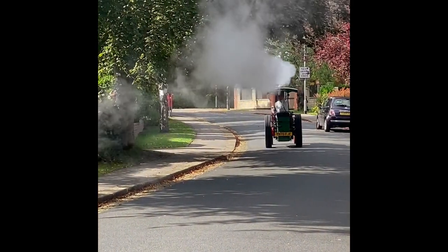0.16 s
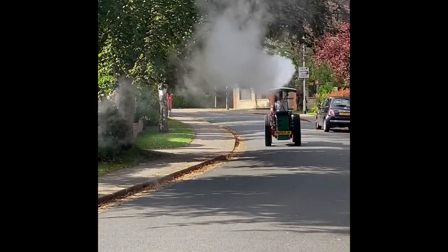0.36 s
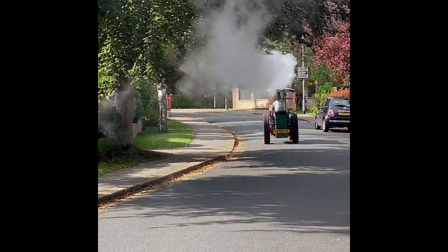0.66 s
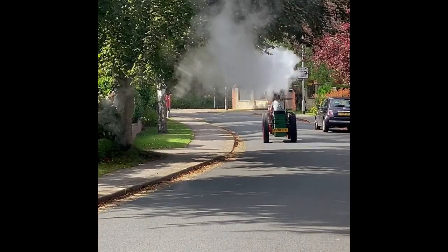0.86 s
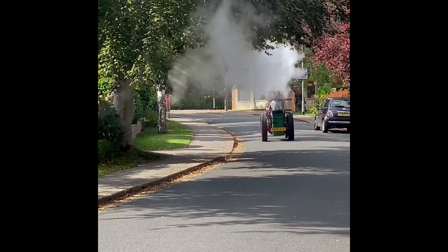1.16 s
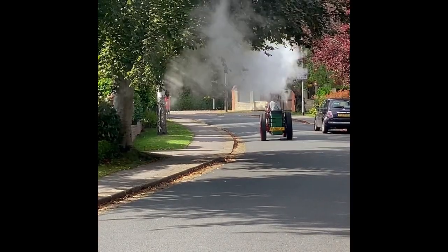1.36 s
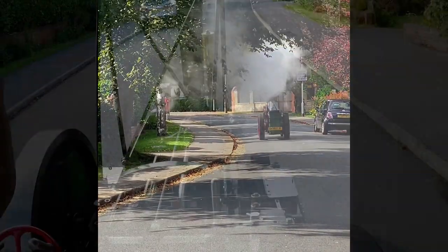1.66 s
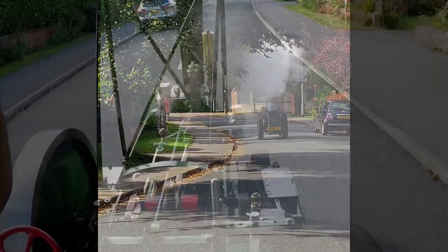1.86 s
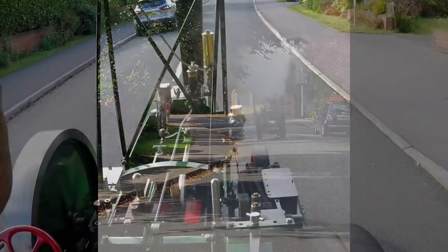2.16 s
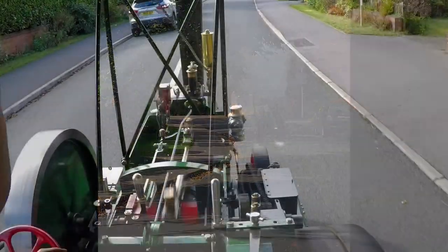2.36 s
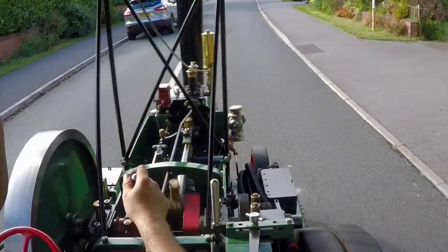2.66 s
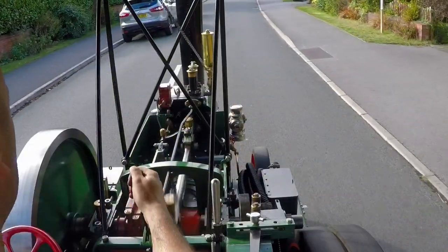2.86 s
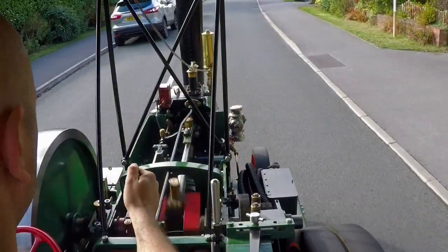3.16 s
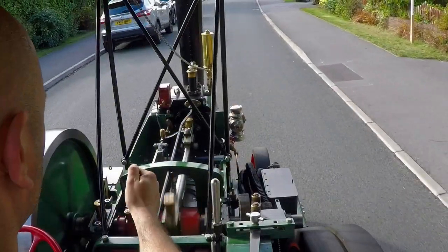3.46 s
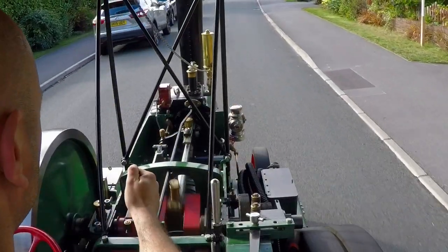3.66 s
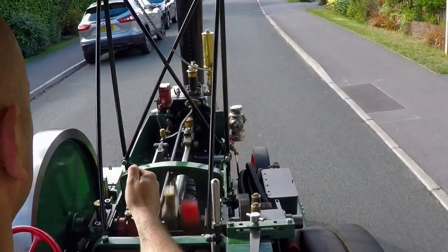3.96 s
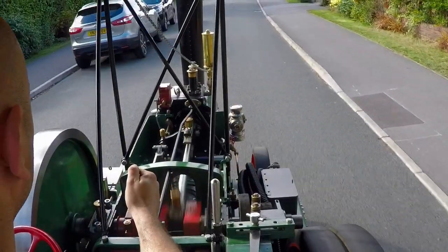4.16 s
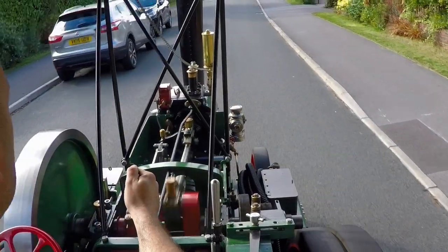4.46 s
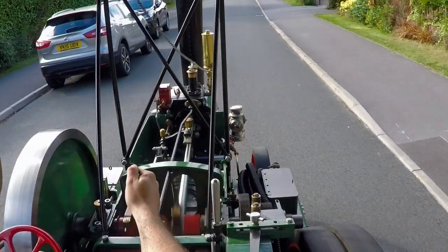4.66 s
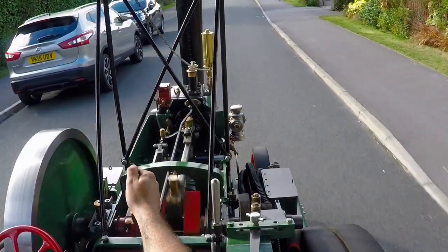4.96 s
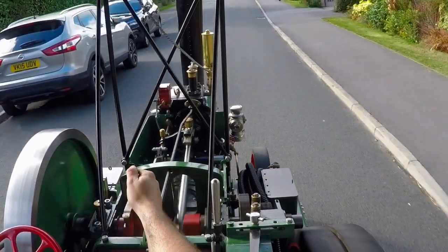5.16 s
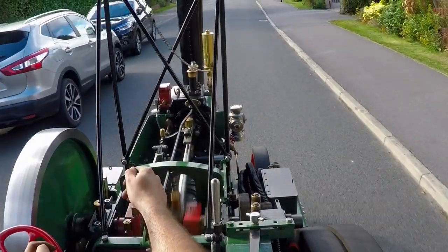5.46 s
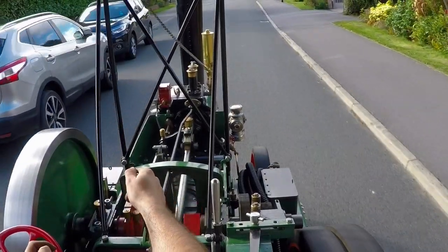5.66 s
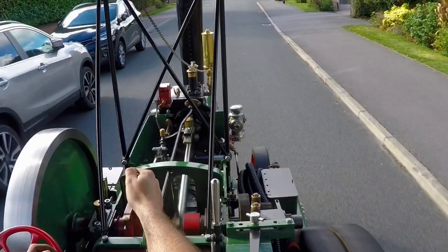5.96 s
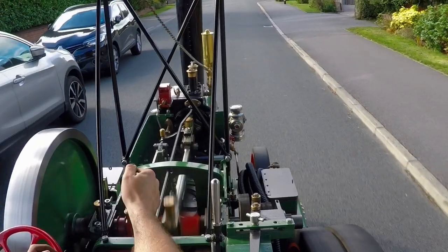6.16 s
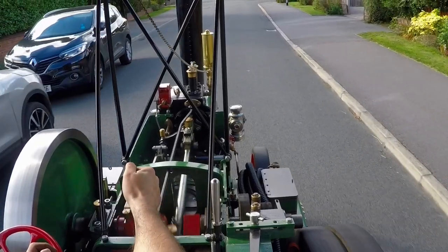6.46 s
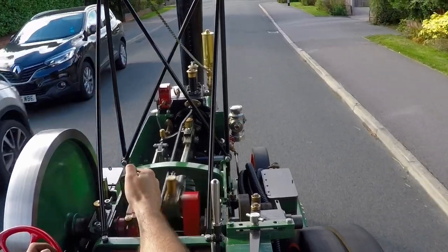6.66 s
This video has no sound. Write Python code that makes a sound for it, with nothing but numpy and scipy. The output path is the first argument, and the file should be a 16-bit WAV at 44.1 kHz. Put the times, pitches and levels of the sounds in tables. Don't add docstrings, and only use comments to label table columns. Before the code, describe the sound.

From 0 to 1.5 s, a small steam tractor moves away along a quiet road, heard from a stereo kerbside microphone. Soft, low chimney pulses come about ten a second, each with a bright burst of steam hiss and a reedy rasp that strengthens around 1 s and then drops. Gentle road noise spreads beneath, easing slightly. Between about 1.5 and 2.4 s this crossfades to the driving seat, far louder, closer and centred. Here heavy low thumps repeat just over eight times a second, shaking the frame over a constant deep rumble of gears and wheels. Rods and castings clank mid-pitched and unevenly, with sharper knocks near 2.7, 2.9 and 3.3 s, while loose parts tick and rattle drily. Faint puffs of valve steam sit on top. The beat stays steady but varied in force, with a particularly hard thump near 6.8 s, continuing to the end at about 7 s.

```python
import sys
import numpy as np
from scipy import signal
from scipy.fft import rfft, irfft, next_fast_len
from scipy.io import wavfile
from scipy.ndimage import uniform_filter1d, map_coordinates

SR = 44100
rng = np.random.default_rng(int(sys.argv[2]) if len(sys.argv) > 2 else 0)


def decibels_to_gain(level_db):
    exponent = np.asarray(level_db, float) / 20
    return 10 ** exponent


def to_wav(s):
    ch = np.atleast_2d(s).T
    pcm = np.round(np.clip(ch, -1, 1) * 32767)
    wavfile.write(sys.argv[1], SR, pcm.astype(np.int16))


N = 300762
T = np.arange(N) / SR


def unit(x):
    return x / np.sqrt(np.mean(x ** 2) + 1e-20)


def along(points, hz):
    f, v = np.transpose(points)
    return np.interp(np.log(hz + 1), np.log(f + 1), v)


def curve(points, t):
    return np.interp(t, *np.transpose(points))


def filtered(x, response):
    m = next_fast_len(N + SR // 2)
    return irfft(rfft(x, m) * response(np.fft.rfftfreq(m, 1 / SR)), m)[..., :N]


def resonances(modes):
    def response(f):
        total = 0
        for k, (hz, width_hz, db) in enumerate(modes):
            damping = 1j * f * width_hz
            total = total + (-1) ** k * decibels_to_gain(db) * damping / (hz * hz - f * f + damping)
        return total
    return response


def sharp_resonance(hz, width_hz):
    return lambda f: resonances([(hz, width_hz, 0)])(f) ** 2


def colour(spectrum):
    return lambda f: decibels_to_gain(along(spectrum, f))


def wobble(rate_hz):
    return map_coordinates(rng.standard_normal(int(N * rate_hz / SR) + 4), [T * rate_hz])


def noise(gain, response):
    passed = np.mean(np.abs(response(np.fft.rfftfreq(2 ** 15, 1 / SR))) ** 2)
    return filtered(gain * rng.standard_normal(N), response) / np.sqrt(passed)


def pulses(times_s, sizes):
    at = np.clip(np.round(np.ravel(times_s) * SR).astype(int), 0, N - 1)
    return np.bincount(at, np.ravel(sizes), N)


def ring_down(blows, t60_s, samples):
    return signal.fftconvolve(blows, decibels_to_gain(-60 * T[:samples] / t60_s))[:N]


def per_beat(times_s, db, shape, rest_db):
    beat = np.clip(np.searchsorted(times_s, T) - 1, 0, None)
    stroke = decibels_to_gain(db[beat] + curve(shape, T - times_s[beat]))
    return uniform_filter1d(np.hypot(stroke, decibels_to_gain(rest_db)), size=90)


def patchy(x, depth_db):
    z = signal.stft(x, nperseg=1024)[2]
    field = uniform_filter1d(rng.standard_normal(z.shape[-2:]), size=3, axis=0)
    field = uniform_filter1d(field, size=3, axis=1)
    gain = decibels_to_gain(depth_db * unit(field) - depth_db ** 2 / 9.7)
    return signal.istft(z * gain, nperseg=1024)[1][..., :N]


# pitch_hz, density_db
ROAD_SPECTRUM = [(40, -51), (60, -23), (130, -4.5), (280, -15), (410, -6.5), (560, -23.5), (970, -12.5),
                 (1490, -20.5), (1820, -15.5), (2500, -20), (3200, -25), (4000, -25), (4700, -26),
                 (6500, -60.5)]
# pitch_hz, correlation
ROAD_LIKENESS = [(60, 1), (300, 0.64), (650, -0.2), (1300, 0.63), (3100, -0.74), (4500, 0.059)]
# time_s, level_db
ROAD_SWELL = [(0, 3), (.4, 0.5), (.8, -1), (1.2, -1), (1.6, -1.5)]


def street():
    def shares(f):
        angle = np.arccos(np.clip(along(ROAD_LIKENESS, f), -1, 1)) / 2
        return decibels_to_gain(along(ROAD_SPECTRUM, f)) * [np.cos(angle), np.sin(angle)]

    gain = decibels_to_gain(0.39 * wobble(13.23) + curve(ROAD_SWELL, T))
    mid, side = filtered(rng.standard_normal((2, N)) * gain, shares)
    return decibels_to_gain(-38) * unit(np.array([mid + side, mid - side]))


FAR_BEATS = 25
# time_s, smokebox_db, chimney_db
CHUFF_LEVELS = [(0.0, -39, -40), (0.106, -40, -42), (0.414, -39, -36.5), (0.474, -40, -39.5),
                (0.668, -40.5, -36.5), (0.85, -44.5, -37), (1.096, -44.5, -38), (1.55, -44.5, -37.5)]
# pitch_hz, width_hz, level_db
SMOKEBOX = [(62, 24, 0), (81, 24, -3), (135, 50, -12)]
# pitch_hz, width_hz, level_db
CHIMNEY = [(172, 40, -11), (209, 29, 0), (402, 36, -9)]


def far_chuff(turns):
    beat = np.arange(-1, FAR_BEATS)[:, None] + [.26, .26 + 11 / 21]
    times = np.interp(beat, turns, T)
    time_s, box_db, pipe_db = np.transpose(CHUFF_LEVELS)
    scatter_db = rng.normal(0, 1.0, times.shape)

    def ring(modes, weak_db):
        sizes = decibels_to_gain(scatter_db + [0, weak_db]) * (beat > -.5)
        return unit(filtered(pulses(times, sizes), lambda f: resonances(modes)(f) ** 2))

    box = decibels_to_gain(np.interp(T, time_s, box_db)) * ring(SMOKEBOX, weak_db=-1.5)
    pipe = decibels_to_gain(np.interp(T, time_s, pipe_db)) * ring(CHIMNEY, weak_db=-1.0)
    return box + pipe


# time_s, level_db
DRAUGHT = [(0, 1.5), (.7, 1), (.82, 3), (1.2, 5), (1.3, -9.5), (1.5, -3.5), (1.8, -4), (2.2, -8.5),
           (2.5, -12)]
# pitch_hz, density_db
STEAM_SPECTRUM = [(3500, -14), (4700, -8.5), (5200, 3.5), (6200, -9), (6900, -3.5), (7500, -7),
                  (8400, -2.5), (9900, -1.5), (11000, -11), (13000, -16.5), (15500, -24)]
# pitch_hz, right_lead_rad
PORT_LEAD = [(3000, 5.5), (4800, 3.2), (5600, 2.7), (8650, 0), (11700, -3.14), (14300, -6.28)]
# pitch_hz, width_hz, level_db
BARK_MODES = [(1880, 160, -2), (1965, 60, -3), (2450, 80, -2), (2840, 80, 0), (2975, 50, -2),
              (3300, 300, -8)]


def far_steam(turns):
    vent_s = np.interp(np.arange(FAR_BEATS) - .15, turns, T, left=-.02)
    draught_db = curve(DRAUGHT, vent_s)
    hiss_db = -35.5 + .35 * draught_db + rng.normal(0, 1, FAR_BEATS)
    bark_db = -36 + draught_db
    plume = [(0, -7), (.01, -2.5), (.035, 0), (.05, -2), (.064, -9), (.085, -6), (.1, -8)]
    level_db = np.interp(T, vent_s, hiss_db)

    hiss_gain = per_beat(vent_s, hiss_db + 2.5, plume, level_db - 6.5) * decibels_to_gain(2.1 * wobble(59.35))
    steam = noise(hiss_gain, colour(STEAM_SPECTRUM))
    ports = lambda f: np.exp(.5j * curve(PORT_LEAD, f) * np.array([[-1], [1]]))
    scattered = decibels_to_gain(level_db - 16) * np.array([noise(1, colour(STEAM_SPECTRUM)) for _ in "LR"])
    bark_gain = per_beat(vent_s, bark_db - 3.5, plume, -51)
    bark = np.array([noise(bark_gain, resonances(BARK_MODES)) for _ in "LR"])
    return patchy(filtered(steam, ports) + scattered + bark, depth_db=2.5)


# time_s, beats_per_s
EXHAUST_RATE = [(0, 10.1), (.7, 9.97), (1.4, 9.87), (2.6, 9.87)]


def far_tractor():
    turns = np.cumsum(curve(EXHAUST_RATE, T)) / SR
    return far_chuff(turns) * decibels_to_gain([[.7], [-.7]]) + far_steam(turns)


def drop_faint(x, floor_db):
    hz, _, z = signal.stft(x, SR, nperseg=1024, scaling="psd")
    power = (np.abs(z[:512]) ** 2).reshape(128, 4, -1).mean(axis=1)
    band_floor_db = 2 * floor_db - 7 * (hz[:512:4, None] > 7000)
    loud = uniform_filter1d(power, 3, axis=1) > decibels_to_gain(band_floor_db)
    z[:512] *= np.repeat(loud, 4, axis=0) | (hz[:512, None] < 3000)
    return signal.istft(z, SR, nperseg=1024, scaling="psd")[1][:N]


def kerb_stereo(x):
    outside = lambda f, low_hz, high_hz: (f < low_hz) | (f > high_hz)
    mid = filtered(x[0] + x[1], lambda f: outside(f, 11150, 12300)) / 2
    side = filtered(x[0] - x[1], lambda f: outside(f, 8350, 9000) & outside(f, 13900, 20000)) / 2
    mid = drop_faint(mid, floor_db=-92.5)
    return np.array([mid + side, mid - side])


# time_s, effort_db, valve_leak_db; the low early rows make the seat view swell in steeply
ENGINE_LOAD = [(1.5, -8.5, -6), (1.8, -4, -4), (2.1, -3, 1), (2.5, -0.5, -3.5), (3.1, 1.5, -3),
               (3.9, 1.5, 1.5), (5.1, .5, 1), (5.4, 2, -0.5), (6.2, 0.5, -1), (6.8, 2.5, 1.5)]
# time_s, thump_db, clank_db
UNEVEN_BEATS = [(2.658, 2.5, 2), (2.782, 3, 0), (3.034, 0, -3), (3.286, 2.5, -1), (3.409, -2.5, 0),
                (3.535, 1.5, 2), (3.658, -1, -3), (3.904, -3, -0.5), (4.027, 2, 0.5), (4.395, 0.5, 0),
                (4.517, -0.5, 2.5), (4.883, 0, 2.5), (5.003, 0.5, 1.5), (5.124, 2.5, 2.5), (5.243, -2, 0),
                (5.485, -4, -1.5), (5.606, 0, -3), (5.725, -0.5, 0.5), (5.846, 0, -0.5), (6.085, 0.5, 0.5),
                (6.326, 0, -2), (6.444, -1, 1), (6.562, 0, 0), (6.802, 5, 4)]


def beats():
    count = 44
    k = np.arange(count)
    beat_s = 1.497 + .1185 * k + .228 * (1 - np.exp(-k / 16.5))
    load_s, effort_db, leak_db = np.transpose(ENGINE_LOAD)
    effort_db = np.interp(beat_s, load_s, effort_db)
    leak_db = np.interp(beat_s, load_s, leak_db)

    odd_s, *odd_db = np.transpose(UNEVEN_BEATS)
    nearest = np.abs(odd_s[:, None] - beat_s).argmin(axis=1)
    thump, clank = (np.bincount(nearest, db, count) for db in odd_db)
    thump_db = -12 + 0.43 * effort_db + thump
    clank_db = -21.5 + effort_db + clank
    rattle_db = -48 + .1 * effort_db + clank
    puff_db = -58 + leak_db + .4 * clank
    return beat_s, thump_db, clank_db, rattle_db, puff_db


def hail():
    knocks = rng.random((700, 2))
    blows = pulses(knocks[:, 0] * N / SR, decibels_to_gain(14 * knocks[:, 1]))
    jolts = np.abs(ring_down(blows, t60_s=0.035, samples=900))
    return np.sqrt(0.82 + 0.15 * unit(jolts) ** 2)


# pitch_hz, density_db
VALVE_SPECTRUM = [(6500, -30), (8500, -9), (9300, -1), (10200, 0), (11000, -15), (13000, -22), (15500, -30)]


def valves():
    beat_s, *_, puff_db = beats()
    puff = [(0, -10), (.004, 0), (.022, -2), (.04, 1.5), (.053, 0), (.063, -12), (.13, -15)]
    gain = per_beat(beat_s, puff_db - 2.5, puff, -76) * decibels_to_gain(1.5 * wobble(70))
    return noise(gain, colour(VALVE_SPECTRUM))


# pitch_hz, density_db
RATTLE_SPECTRUM = [(2000, -30), (2800, 0), (3500, -3), (5000, -9), (6200, -14), (8000, -23), (10000, -33),
                   (15000, -44)]
# pitch_hz, width_hz, level_db
PIN_MODES = [(4850, 350, -2), (5950, 350, 0), (7650, 250, -3)]
# start_s, peak_db
LOOSE_TICKS = [(2.453, -28.5), (2.6638, -35), (2.686, -19.5), (2.7516, -27), (2.8795, -25.5),
               (3.1955, -34.5), (3.246, -24.5), (3.334, -34), (3.355, -24), (3.7882, -36), (3.8582, -25),
               (3.9482, -26.5), (4.082, -24), (4.2815, -26), (3.928, -31), (4.313, -31), (4.632, -25),
               (4.808, -30), (4.902, -20), (5.1556, -22.5), (5.4777, -22), (5.7388, -25), (6.24, -23),
               (6.2726, -27), (6.3664, -28)]


def small_parts(grain):
    beat_s, *_, rattle_db, _ = beats()
    loose = [(0, -1.5), (.014, 0.5), (.05, -1.5), (.06, -7), (.13, -4.5)]
    knock_ticks = [(at_s, -26 + 0.41 * db) for at_s, db in ROD_KNOCKS]
    tick_s, tick_db = np.transpose(list(LOOSE_TICKS) + knock_ticks)
    tick = ring_down(pulses(tick_s, decibels_to_gain(tick_db - 11)), t60_s=.018, samples=1800)

    chance = rng.random((220, 3))
    chatter_s = beat_s[(chance[:, 0] * len(beat_s)).astype(int)] + .11 * chance[:, 2] ** 2
    chatter = ring_down(pulses(chatter_s, decibels_to_gain(-51.5 + 9.2 * chance[:, 1])), t60_s=.018, samples=900)
    tick = np.hypot(tick, chatter)

    rattle = per_beat(beat_s, rattle_db, loose, -59.5) * grain
    out = noise(np.hypot(rattle, tick), colour(RATTLE_SPECTRUM))
    for hz, width_hz, db in PIN_MODES:
        out = out + decibels_to_gain(db) * noise(decibels_to_gain(-69 + 2.6 * wobble(40)), sharp_resonance(hz, width_hz))
    return out


# pitch_hz, width_hz, level_db
CASTING_MODES = [(415, 23.6, 0.5), (482.8, 43.4, 2), (719, 234, -11.5), (928.7, 59, -1), (1103, 40.4, -1.5),
                 (1204, 51, 1), (1587, 154, -8), (1846, 173, -12.5), (2333, 400, -16), (2488, 87, -14),
                 (2850, 37, -20.5)]
# start_s, level_db
ROD_KNOCKS = [(2.021, 3.5), (2.165, 0.5), (2.2808, 2.5), (2.4126, 2), (2.5362, 4), (2.661, 2), (2.683, 8.5),
              (2.9105, 5), (3.287, 5), (3.4158, 4.5), (3.4317, 2), (3.5417, -16), (3.662, 4.5), (3.909, -7),
              (4.0188, 3), (4.2237, -0.5), (4.367, 2), (4.5206, -9), (4.839, -5.5), (5.3534, 5),
              (5.6995, -0.5), (5.7165, 3), (5.9634, -2), (6.0967, 4), (6.241, 4), (6.3647, -2), (6.568, 3)]


def castings(grain):
    beat_s, _, clank_db = beats()[:3]
    clank = [(0, -2.5), (.006, 1), (.035, -2.5), (.055, -8), (.13, -5.5)]
    knock_s, knock_db = np.transpose(ROD_KNOCKS)
    rap = ring_down(pulses(knock_s, decibels_to_gain(knock_db - 18)), t60_s=0.062, samples=3000)
    drive = np.hypot(per_beat(beat_s, clank_db + 0.5, clank, -28.0) * grain, rap)

    out = noise(drive * decibels_to_gain(3.2 * wobble(30) - 2.5), resonances(CASTING_MODES))
    for hz, width_hz, db in CASTING_MODES:
        part = noise(drive * decibels_to_gain(1.2 * wobble(22)), sharp_resonance(hz, 1.3 * width_hz))
        out = out + decibels_to_gain(db - 11) * np.sqrt(width_hz / 60) * part
    return out


# delay_s, level_db
BEAT_BLOWS = [
    (.009, 0),
    (.023, -3),
    (.047, -7),
    (.085, -9),
    (.105, -9),
]
# pitch_hz, width_hz, level_db
FRAME_MODES = [(94.6, 28, -7.5), (141, 14.35, 1), (166.5, 19.8, -0.5), (228.1, 23, -14.5), (279.5, 14, -16)]
# pitch_hz, width_hz, level_db
WHEEL_MODES = [(33, 7, -12), (39.5, 7, 0), (57.5, 9, -1.5)]


def frame():
    beat_s, thump_db = beats()[:2]
    delay_s, blow_db = np.transpose(BEAT_BLOWS)
    chance = rng.standard_normal((len(beat_s), 2, len(delay_s)))
    blow_s = beat_s[:, None] + delay_s + 0.000866 * chance[:, 0]
    blows = pulses(blow_s, decibels_to_gain(thump_db[:, None] + blow_db + 2.2 * chance[:, 1]))
    thump = decibels_to_gain(-18.5) * unit(filtered(blows, resonances(FRAME_MODES)))

    push = [(0, 8), (.015, -7), (.05, -0.5), (.09, 3), (.13, -5)]
    shake_gain = per_beat(beat_s, thump_db - 3.0, push, -23.5) * decibels_to_gain(2.44 * wobble(25))
    shake = noise(shake_gain, resonances(FRAME_MODES))

    def springy(f):
        modes = sum(resonances([mode])(f) for mode in WHEEL_MODES)
        return modes / (1 + (f / 90) ** 4) / (1 + (28 / (f + 1)) ** 6)

    bounce = decibels_to_gain(-23.5) * unit(filtered(blows, springy)) + noise(decibels_to_gain(-16.0), springy)
    return thump + shake + bounce


# pitch_hz, level_db
HEAVY_TONE = [(20, -14.5), (32, -3), (2600, -1.5), (3300, -13.5), (6000, -30.5), (12000, -53)]
VIEW_DISSOLVE = 1.464, 2.386


def scene():
    start_s, end_s = VIEW_DISSOLVE
    near = np.clip((T - start_s) / (end_s - start_s), 0, 1)
    kerb = kerb_stereo(far_tractor() + patchy(street(), depth_db=3))

    grain = hail()
    heavy = frame() + patchy(castings(grain), depth_db=1.0)
    heavy = heavy / (1 + np.abs(heavy / 1.1) ** 6) ** (1 / 6)
    light = patchy(small_parts(grain) + valves(), depth_db=3)
    seat = filtered(heavy, colour(HEAVY_TONE)) + light
    return (1 - near) * kerb + near * seat


def low_pass(x):
    return signal.sosfilt(signal.butter(12, 15680, fs=SR, output="sos"), x)


def record(dry):
    return low_pass(dry)


dry = scene()
out = record(dry)
to_wav(out)
```